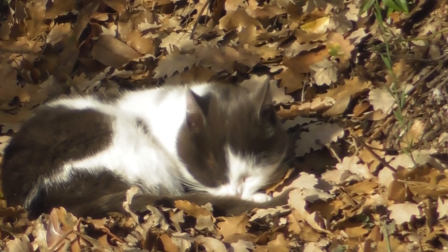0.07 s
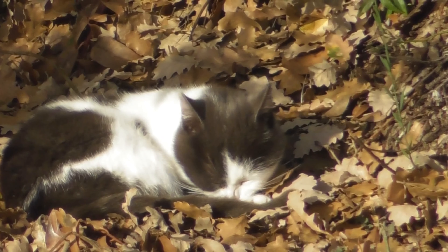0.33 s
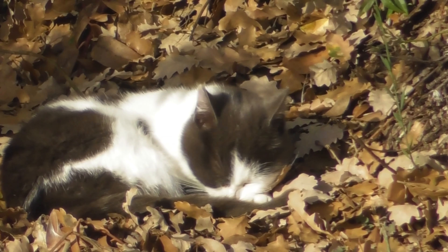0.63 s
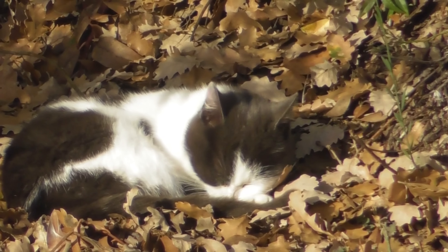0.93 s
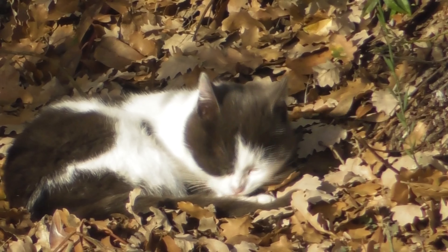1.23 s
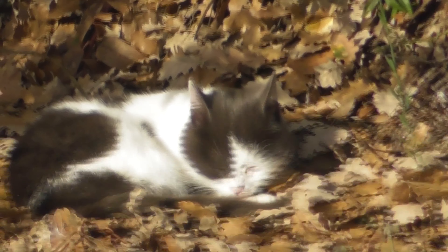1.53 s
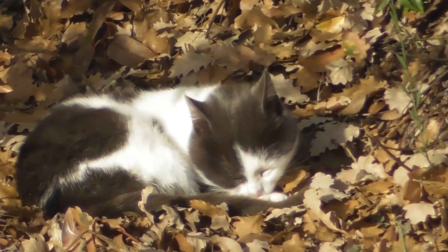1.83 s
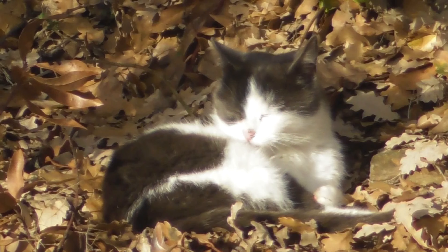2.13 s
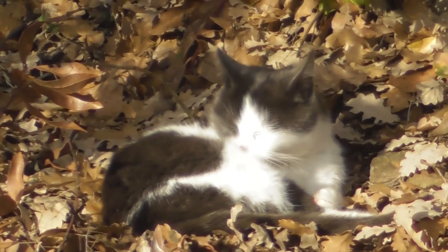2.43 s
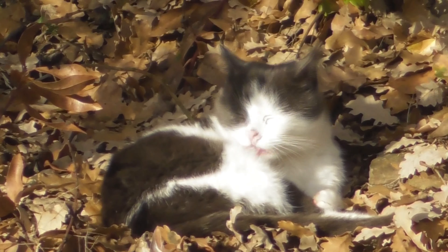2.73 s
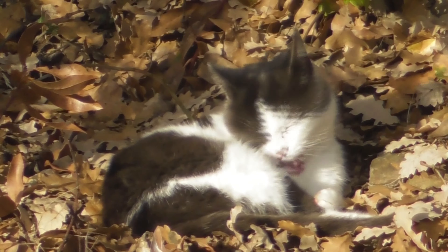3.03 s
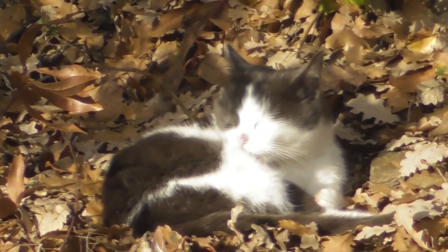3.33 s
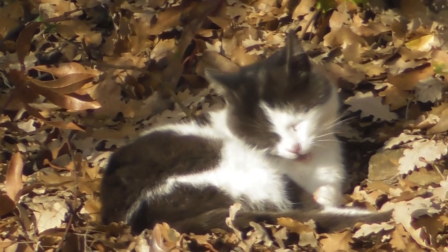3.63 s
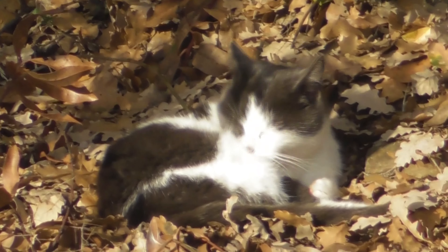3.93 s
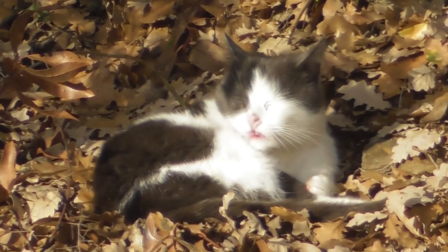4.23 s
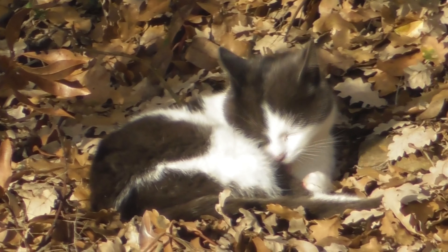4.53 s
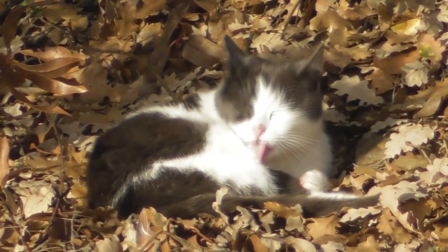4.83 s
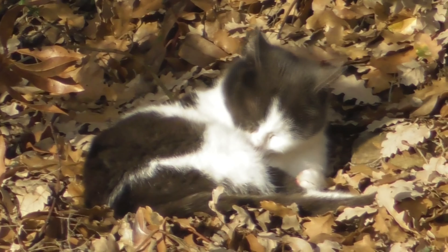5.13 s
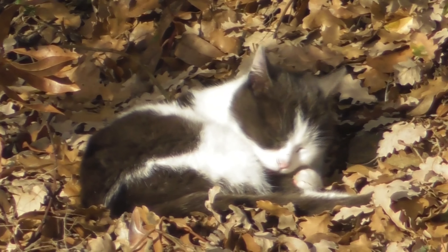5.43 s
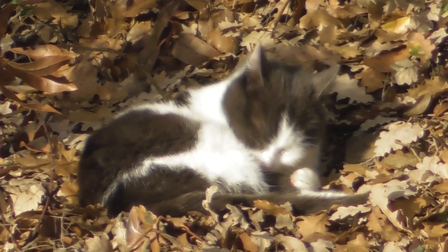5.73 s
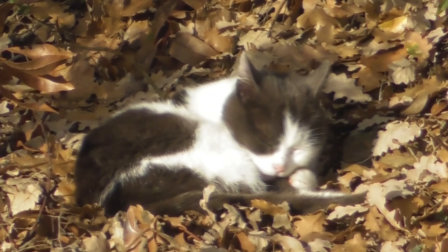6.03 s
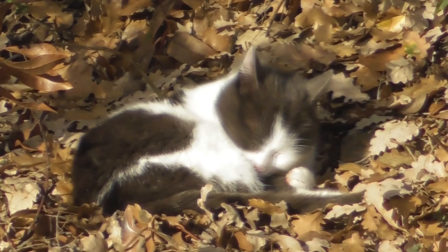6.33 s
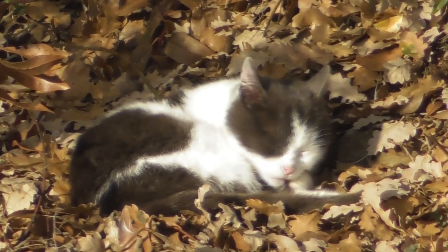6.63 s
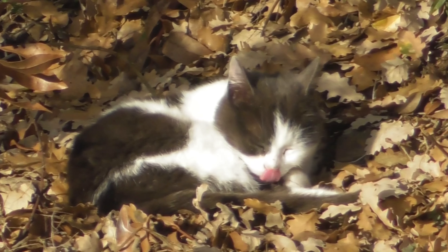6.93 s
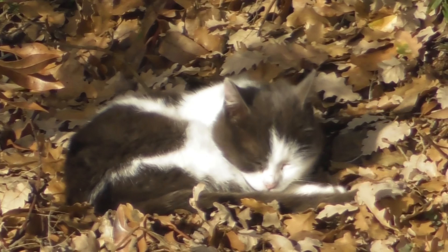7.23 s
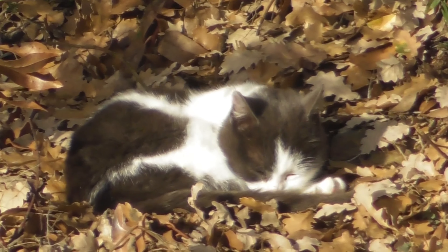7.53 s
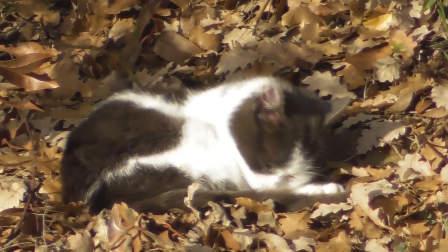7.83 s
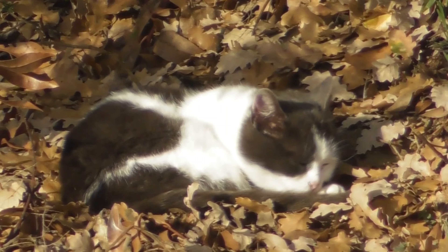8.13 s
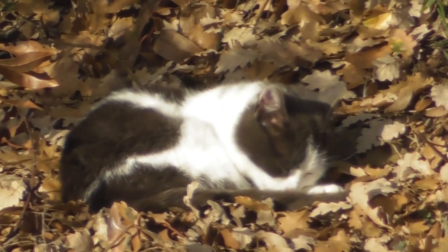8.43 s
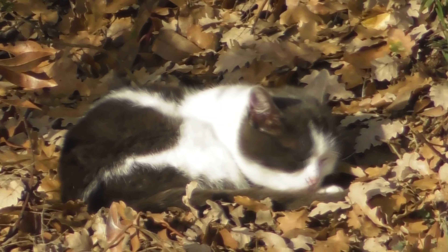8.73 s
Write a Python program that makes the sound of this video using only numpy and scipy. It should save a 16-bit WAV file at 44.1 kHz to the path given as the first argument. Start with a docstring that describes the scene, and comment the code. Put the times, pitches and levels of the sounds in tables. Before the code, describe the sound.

Soft air and microphone hiss fill a very quiet wood. After a few dry scuffs, a hand bumps the camera twice, making close, hollow booms and plastic clicks, by far the loudest sounds. Then dry leaves rustle faintly under a washing cat, the lens motor ticks in short runs, a tiny bird repeats one high note and a distant engine drones. Near the end a finger knocks lightly on the case.

```python
"""Soft air and microphone hiss fill a very quiet autumn wood; dry leaves rustle as a cat washes itself.
A hand bumps the camera twice: its case booms and clicks, and the iris motor gives a thin whistle.
The lens motor ticks in short runs, a tiny bird repeats one high note and a distant engine drones.
Near the end a far whirr swells and a finger knocks on the case."""
import sys
import numpy as np
from scipy import signal
from scipy.fft import rfft, irfft, next_fast_len
from scipy.io import wavfile
from scipy.ndimage import uniform_filter1d

SR = 44100
rng = np.random.default_rng(int(sys.argv[2]) if len(sys.argv) > 2 else 0)


def to_wav(s):
    """Save 16-bit WAV."""
    ch = np.atleast_2d(s).T  # columns
    pcm = np.round(np.clip(ch, -1, 1) * 32767)  # PCM
    wavfile.write(sys.argv[1], SR, pcm.astype(np.int16))


N = 391166
T = np.arange(N) / SR

# The bed: outdoor air and microphone hiss. Each row: frequency in Hz, relative density in dB.
AIR_COLOUR = [(20, -9), (50, 0), (68, -4), (88, 5.5), (115, -4.5), (180, 2.5), (240, -3), (320, 1.5),
              (420, -3.5), (700, -7.5), (920, -5), (1150, -18), (1500, -25), (3000, -50)]
HISS_COLOUR = [(600, -4), (1100, 2), (1500, -6), (2300, -3), (2800, -12.5), (3400, -4.5), (4100, -5.5),
               (5000, -16), (5600, -6.5), (6300, -7.5), (7500, -1), (9500, 0.5), (15500, 0.5)]
# Faint tints in the hiss. Each row: frequency in Hz, width in Hz, gain in dB.
HISS_RESONANCES = [(1732, 140, -6.5), (2085, 110, 2)]

# Dry scuffs, soft hand rubs and fur on leaves.
# Each row: peak time in seconds, level in dB, rise and decay in seconds.
DRY_SCUFFS = [(.463, -47, 0.0014, 0.014), (.49, -56, 0.022, 0.064), (1.364, -62, 0.0015, 0.034),
              (8.35, -72.5, 0.047, 0.047), (8.456, -65, 0.0033, 0.0099), (8.52, -65, 0.066, 0.065)]
HAND_RUBS = [(.32, -64, 0.022, 0.092), (.63, -67, 0.011, 0.022), (.71, -63.5, 0.048, 0.095),
             (1.16, -68.5, 0.0099, 0.044), (4.15, -69, 0.19, 0.086), (8.52, -67, 0.18, 0.075)]
LEAF_RUSTLES = [(.22, -73.5, .25, 0.45), (3.45, -79, 0.064, .08), (4.03, -70.5, 0.17, 0.22),
                (4.55, -76, 0.085, 0.15), (4.89, -72, 0.056, 0.13), (8.83, -72, 0.097, .06)]
# The tone of each of the three. Each row: frequency in Hz, relative density in dB.
DRY_SCUFF_COLOUR = [(290, -39.5), (500, -9), (638, -7.5), (748, 0), (839, -0.5), (982, 0.5), (1180, -1.5),
                    (1600, -11), (2130, -1.5), (2330, -10.5), (4020, -2), (4980, -14.5), (7670, 0),
                    (13600, -21.5), (15500, -9)]
HAND_RUB_COLOUR = [(40, -6), (160, 2), (400, -2), (700, -3.5), (1100, -11.5), (1700, -30), (4000, -35.5)]
LEAF_COLOUR = [(1500, -16), (3800, -7.5), (5000, -14.5), (6300, -4.5), (7800, -1.5), (9500, -4),
               (12000, -9.5), (15500, -12)]
# Short, crisp scratches. Each row: peak time in seconds, level in dB, band centre in Hz.
CRISP_SCRATCHES = [(1.152, -71, 8700), (2.94, -78, 7000), (5.604, -75, 7260), (5.679, -77, 7420),
                   (5.85, -77, 7200), (6.06, -74, 7570), (8.27, -75, 7180)]

# The hand pushes on the case.
# Each row: start in seconds, level in dB, hold in seconds, brightness in dB, relative rasp in dB.
HAND_PUSHES = [(1.357, -21, 0.035, -6.5, -37), (1.7588, -28, 0.03, 2, -30.5)]
# The hollow voice of the case. Each row: frequency in Hz, width in Hz, gain in dB.
CASE_MODES = [(97, 13, -2.5), (148, 30, -0.5), (174, 26, 5), (240.6, 49, 1), (310, 27, 4), (359, 21, 0),
              (388, 8.4, 2), (456, 15, 1.5), (523, 14, -3), (589, 38, -4), (688, 8.9, -7), (722, 12, -7),
              (802.6, 16, -6), (890, 86, -15.5), (1131, 33, -18), (1222, 45, -14.5)]
# Skin sliding on the case. Each row: frequency in Hz, relative density in dB.
SKIN_COLOUR = [(900, -11.5), (1600, -6), (2200, 7), (2900, -9.5), (3500, -1), (4300, -6.5), (5100, -19),
               (7000, -17), (10000, -25.5), (15000, -31.5)]
# The case thuds or hums on under pressure.
# Each row: peak time in seconds, level in dB, rise and decay in seconds, pitch in Hz.
CASE_HUMS = [(1.498, -30, .008, 0.006, 150), (1.5, -37, 0.05, 0.045, 383.7),
             (1.598, -35.5, 0.0028, 0.0051, 115), (1.88, -40, .03, 0.095, 246.8)]
# Sharp case clicks, and one bright crackle in the leaves at 3.53 s. Each row: peak time in seconds, level in
# dB, rise in seconds, treble gain in dB.
CASE_CLICKS = [(1.5943, -30, 0.0022, 1), (1.7251, -40, .0003, -6), (1.7389, -37, .0003, -4.5),
               (1.7827, -26.5, 0.0023, -3.5), (1.83, -41.5, .0015, -2), (1.8378, -40, .0003, -7.5),
               (3.528, -77, .0004, 19), (8.5156, -60.5, 0.00042, 5)]
# The tone of crackling plastic. Each row: frequency in Hz, relative density in dB.
PLASTIC_COLOUR = [(500, -4.5), (900, 9), (1600, -9), (2400, -3.5), (2900, -12), (3500, 4), (4300, -4),
                  (4800, -3.5), (7300, -2.5), (10000, -9.5), (15000, -19.5)]

# Iris motor whistles. Each row: midpoint in seconds, fundamental level in dB, half length in seconds.
IRIS_WHISTLES = [(1.64, -86, .11), (5.61, -91.5, .09), (8.48, -92, .09)]
# The lens motor holds with light ticks and hunts with firm ones. Each row: start and end in seconds.
LENS_HOLDING = [(3.93, 4.93), (5.81, 7.53), (8.45, 8.87)]
LENS_HUNTING = [(1.95, 2.02), (3.97, 4.05), (4.11, 4.29), (4.41, 4.65), (4.73, 4.89), (5.81, 6.19),
                (6.31, 6.75), (6.85, 7.11), (7.25, 7.27), (7.35, 7.37), (7.45, 7.53), (8.49, 8.87)]
# The ring of the lens barrel. Each row: frequency in Hz, width in Hz, gain in dB.
BARREL_MODES = [(1338, 41, 5), (2323, 200, 1), (2494, 240, 1), (3010, 150, -6), (3380, 120, -1),
                (4140, 370, -5.5), (4650, 190, -8), (5960, 1700, -13.5)]

# The small bird's phrases. Each row: start and end in seconds, level in dB.
BIRD_PHRASES = [(2.521, 3.22, -86), (5.197, 5.3, -86), (5.911, 7.0, -82.5), (7.24, 7.34, -84)]
# The distant engine's fundamental. Each row: time in seconds, pitch in Hz, level in dB.
ENGINE_CURVE = [(3.2, 52.4, -89), (3.43, 49.0, -81), (3.74, 49.2, -75.5), (4.1, 47.5, -64.5),
                (4.81, 43.7, -74), (5.23, 43.7, -82), (5.52, 47.8, -74), (6.19, 47.7, -89),
                (6.35, 61.1, -84.5), (6.45, 63.9, -81), (7.0, 63.8, -77)]
# The far whirr. Each row: peak time in seconds, level in dB, rise and decay in seconds.
WHIRR_SWELLS = [(7.37, -76, 0.092, 0.24), (8.3, -74, 0.22, .45)]

# A finger grazes the case, then lands. Each row: start in seconds, strength in dB.
FINGER_HITS = [(8.4007, -58.5), (8.4208, -41)]
# The ring of the knocked case. Each row: frequency in Hz, gain in dB, seconds to fall by 60 dB.
KNOCK_RING = [(424, -7.5, 0.052), (665, -10.5, 0.027), (828, -1, 0.044), (1070, 4.5, 0.011),
              (1244, 1, 0.021), (1980, -8.5, 0.014)]


def from_db(db):
    """Decibels to gain."""
    return 10 ** (np.asarray(db) / 20)


def rms_one(x):
    """Scale to rms 1."""
    return x / np.sqrt(np.mean(x ** 2) + 1e-20)


def white(alike):
    """Stereo white noise; alike is the left-right correlation."""
    mid, side = rng.standard_normal((2, N))
    return (np.sqrt(1 + alike) * mid + np.sqrt(1 - alike) * side * [[1], [-1]]) / np.sqrt(2)


def coloured(spectrum, alike):
    """Steady stereo noise at rms 1, shaped to a spectrum and rolled off below its first point."""
    hz, db = np.transpose(spectrum)
    size = next_fast_len(N)
    bins_hz = np.maximum(np.fft.rfftfreq(size, 1 / SR), 1)
    gain = from_db(np.interp(np.log(bins_hz), np.log(hz), db)) * np.minimum(bins_hz / hz[0], 1) ** 2
    return rms_one(irfft(rfft(white(alike), size) * gain, size)[:, :N])


def butter(x, hz, kind, order=2):
    """Low-, high- or band-pass."""
    return signal.sosfilt(signal.butter(order, hz, kind, fs=SR, output="sos"), x)


def crossover(x, hz):
    """Split into lows and highs that add back to the whole."""
    lows = signal.sosfiltfilt(signal.butter(2, hz, fs=SR, output="sos"), x)
    return lows, x - lows


def resonate(x, modes):
    """Parallel resonances of alternating sign."""
    out = 0
    for k, (hz, width, db) in enumerate(modes):
        radius = np.exp(-np.pi * width / SR)
        forward = (1 - radius ** 2) / 2 * np.array([1, 0, -1])
        feedback = [1, -2 * radius * np.cos(2 * np.pi * hz / SR), radius ** 2]
        out = out + (-1) ** k * from_db(db) * signal.lfilter(forward, feedback, x + 1e-18)
    return out


def swells(rows):
    """Envelope of events that rise to a peak and die away; their powers add."""
    power = np.zeros(N)
    for s, db, rise, decay in rows:
        near = slice(max(int((s - 10 * rise) * SR), 0), int((s + 10 * decay) * SR))
        age = T[near] - s
        power[near] += from_db(db) ** 2 * np.exp(-2 * np.maximum(-age / rise, age / decay))
    return np.sqrt(power)


def pan(left_db):
    """Left and right gains for a level difference."""
    return from_db(np.array([[left_db], [-left_db]]) / 2)


def background():
    """Wide, soft outdoor air under a centred, faintly tinted microphone hiss."""
    air = from_db(-67) * coloured(AIR_COLOUR, alike=-.43)
    hiss = from_db(-71) * coloured(HISS_COLOUR, alike=.99)
    tint = butter(resonate(white(alike=.97), HISS_RESONANCES), 2600, "low", order=4)
    return air + hiss + from_db(-84) * rms_one(tint)


def brushing():
    """Friction in swells of noise: dry scuffs, soft hand rubs and fur rustling on leaves."""
    scuffs = swells(DRY_SCUFFS) * coloured(DRY_SCUFF_COLOUR, alike=.96)
    rubs = swells(HAND_RUBS) * coloured(HAND_RUB_COLOUR, alike=.35)
    rustles = swells(LEAF_RUSTLES) * coloured(LEAF_COLOUR, alike=.97)
    return scuffs + rubs + rustles


def scratches(width_hz=900, rise_s=.0071, decay_s=.038):
    """Each little scratch is a burst of hiss in one narrow band."""
    out = np.zeros((2, N))
    hiss = white(alike=.9)
    for s, db, hz in CRISP_SCRATCHES:
        near = np.abs(T - s) < .25
        band = butter(hiss[:, near], [hz - width_hz / 2, hz + width_hz / 2], "band")
        out[:, near] += swells([(s, db, rise_s, decay_s)])[near] * rms_one(band)
    return out


def grip(attack_s=.016, fade_db_per_s=124.5, bite_db=12, bite_s=.023):
    """Level, brightness and rasp in dB: each push rises, holds and fades, and the strongest rules."""
    s, db, hold, bright_db, rasp_db = np.transpose(HAND_PUSHES)[:, :, None]
    age = np.maximum(T - s, 0)
    attack_db = 20 * np.log10(np.clip(age / attack_s, 1e-6, 1))
    level_db = db + attack_db - fade_db_per_s * np.maximum(age - attack_s - hold, 0)
    edge_db = bite_db * np.exp(-age / bite_s)   # a push starts bright, then dulls
    strongest = level_db.argmax(axis=0)
    return [np.choose(strongest, curve) for curve in (level_db, bright_db + edge_db, rasp_db + edge_db)]


def hand_bumps(end_s=2.021, fade_s=.00316):
    """Hand friction makes the case boom; each push starts bright and raspy, then dulls."""
    level_db, bright_db, rasp_db = grip()
    shared, apart = rng.standard_normal((2, N))
    # left and right move together in the bass and less so higher up
    friction = shared + (.21 * apart + .41 * butter(apart, 570, "high")) * [[1], [-1]]
    boom = butter(resonate(friction, CASE_MODES), 1100, "low", order=4)
    boom = butter(boom, 95, "high")
    power = uniform_filter1d(np.mean(boom ** 2, axis=0), size=700)
    lows, highs = crossover(boom / np.sqrt(power + 1e-12), 560)   # flattened: the grip sets the level
    boom = from_db(level_db) * (lows + highs * from_db(bright_db))
    rasp = from_db(level_db + rasp_db) * coloured(SKIN_COLOUR, alike=.9)
    rumble = rms_one(butter(resonate(white(alike=.72), [(43.8, 26, 0)]), 70, "low"))
    sway = from_db(-49 + .3 * level_db) * rumble   # the camera sways, loosely following the push
    slide = from_db(-72.5) * coloured(PLASTIC_COLOUR, alike=.86)
    hums = sum(swells([row]) * np.sqrt(2) * np.sin(2 * np.pi * hz * T + rng.uniform(0, 2 * np.pi))
               for *row, hz in CASE_HUMS)
    # the boom and rasp cut off abruptly
    gate = np.clip(np.minimum(T - HAND_PUSHES[0][0], end_s - T) / fade_s, 0, 1)
    return gate * ((boom + sway + hums) * pan(left_db=-2) + rasp + slide)


def case_clicks(decay_s=.0017, tail_s=.016):
    """Plastic parts slip, and once a dry leaf snaps, in a crackle of a few milliseconds, with a soft tail."""
    lows, highs = crossover(coloured(PLASTIC_COLOUR, alike=.94), 4800)
    body = swells([(s, db, rise, decay_s) for s, db, rise, _ in CASE_CLICKS])
    top = swells([(s, db + treble_db, rise, decay_s) for s, db, rise, treble_db in CASE_CLICKS])
    tail = swells([(s, db - 21.5, rise, tail_s) for s, db, rise, _ in CASE_CLICKS])
    return lows * body + highs * top + tail * coloured(PLASTIC_COLOUR, alike=.9)


def iris_motor(pitch_hz=5779, octave_db=1):
    """The motor runs for a moment: a thin, unsteady whistle with its octave."""
    gate = sum(from_db(db) * np.exp(-np.minimum(np.abs(T - s) / half, 2) ** 10)
               for s, db, half in IRIS_WHISTLES)
    jitter = .6 * rms_one(butter(rng.standard_normal(N), 50, "low"))
    phase = 2 * np.pi * pitch_hz * T + jitter
    return gate * np.sqrt(2) * (np.sin(phase) + from_db(octave_db) * np.sin(2 * phase))


def lens_motor(period_s=.02, first_s=.0138, step_hz=1160, count=4, firm_db=-77, light_db=-86):
    """Fifty times a second the motor makes a few quick steps, which ring the barrel."""
    holding, hunting = [sum((T >= a) & (T < b) for a, b in spans) > 0
                        for spans in (LENS_HOLDING, LENS_HUNTING)]
    starts = np.arange(first_s, T[-1] - period_s, period_s)
    steps = np.zeros(N)
    for k in range(count):
        at = np.round((starts + k / step_hz) * SR).astype(int)
        steps[at] = from_db(-5.5 * k + rng.normal(0, 1, len(starts)))   # each step softer than the last
    moving = (T - first_s) % period_s < count / step_hz
    steps = steps + .11 * moving * white(alike=1)   # grit
    firm_ticks = rng.random(len(starts) + 2) < .8   # now and then a tick stays light
    firm = firm_ticks[np.searchsorted(starts, T + 1 / SR)]
    force = np.where(hunting & firm, from_db(firm_db), holding * from_db(light_db))
    return resonate(steps * force, BARREL_MODES) / np.std(resonate(steps, BARREL_MODES))


def bird(pitch_hz=7260, spread_hz=45, every_s=.23, half_length_s=.053, smear_hz=110):
    """Thin high notes at an even pace, smeared by the trees into narrow bands."""
    notes = np.zeros(N)
    smear = rms_one(butter(white(alike=.54), smear_hz, "low"))
    for start, end, db in BIRD_PHRASES:
        for s in np.arange(start, end, every_s):
            near = np.abs(T - s) < 3 * half_length_s
            age = T[near] - s
            envelope = from_db(db) * np.exp(-(age / half_length_s) ** 2 / 2)
            hz = rng.normal(pitch_hz, spread_hz)
            notes[near] += envelope * np.sqrt(2) * np.sin(2 * np.pi * hz * age)
    return notes * smear


def engine(drone_at_s=7.61, drone_half_s=.42):
    """A far engine sinks in pitch, then picks up and holds; its third harmonic swells into a drone."""
    times, *columns = np.transpose(ENGINE_CURVE)
    hz, level_db = [np.interp(T, times, column) for column in columns]
    phase = 2 * np.pi * np.cumsum(hz) / SR
    waver = 1 + .15 * rms_one(butter(white(alike=.6), 10.7, "low"))
    drone = 1 / (1 + ((T - drone_at_s) / drone_half_s) ** 6)
    third = from_db(-91.5) + from_db(-73.5) * drone
    return np.sqrt(2) * waver * (from_db(level_db) * np.sin(phase) + third * np.sin(3 * phase))


def far_whirr(centre_hz=856, width_hz=57):
    """A narrow band of noise swells twice once the engine has picked up."""
    band = resonate(white(alike=.45), [(centre_hz, width_hz, 0)])
    return swells(WHIRR_SWELLS) * rms_one(butter(band, 970, "low", order=4))


def finger_knock():
    """Each contact of the finger gives a tick and sets a few damped modes of the case ringing."""
    age = T[:SR // 8]
    ring = sum((-1) ** k * from_db(db - 60 * age / t60) * np.sin(2 * np.pi * hz * age)
               for k, (hz, db, t60) in enumerate(KNOCK_RING))
    hits = np.zeros(N)
    for s, db in FINGER_HITS:
        hits[round(s * SR)] = from_db(db)
    tick_envelope = swells([(s + .00074, db - 15.5, .0003, .002) for s, db in FINGER_HITS])
    tick = tick_envelope * coloured(PLASTIC_COLOUR, alike=.74)
    return signal.fftconvolve(hits, ring)[:N] * pan(left_db=-4.5) + tick


def scene():
    """The camera's own noises up close, with the wood around them."""
    camera = hand_bumps() + case_clicks() + finger_knock() + lens_motor() + iris_motor()
    return camera + brushing() + scratches() + bird() + engine() + far_whirr() + background()


def record(dry):
    """A steep low-pass shaves off the top above 15.8 kHz."""
    return signal.sosfilt(signal.ellip(12, .1, 80, 15800, fs=SR, output="sos"), dry)


dry = scene()
out = record(dry)
to_wav(out)
```